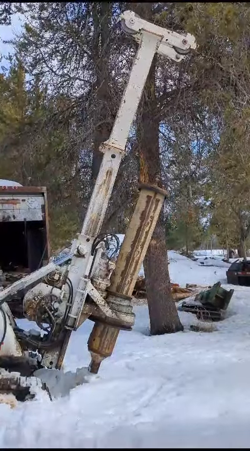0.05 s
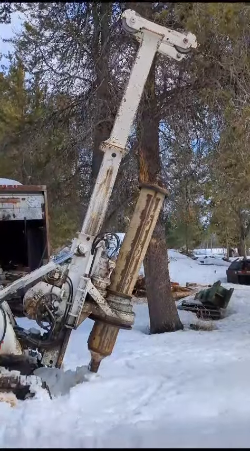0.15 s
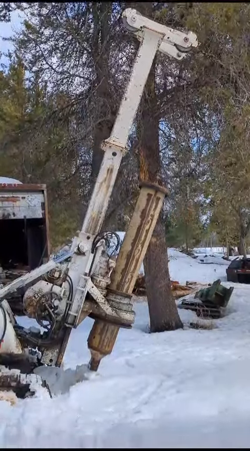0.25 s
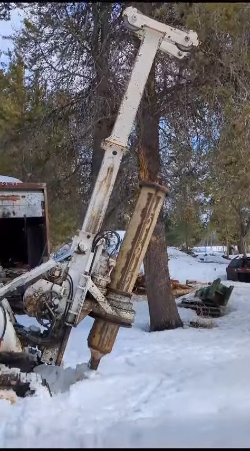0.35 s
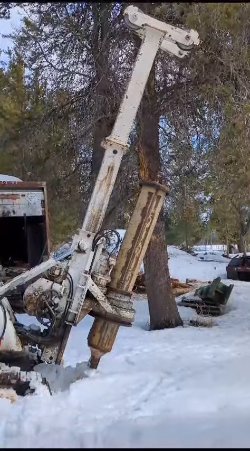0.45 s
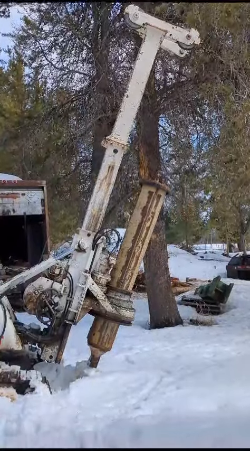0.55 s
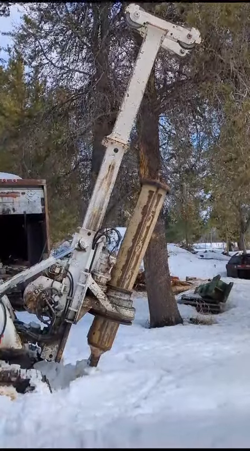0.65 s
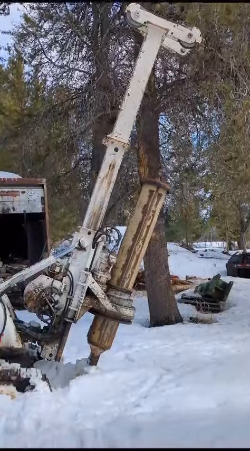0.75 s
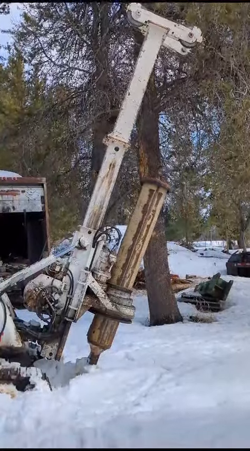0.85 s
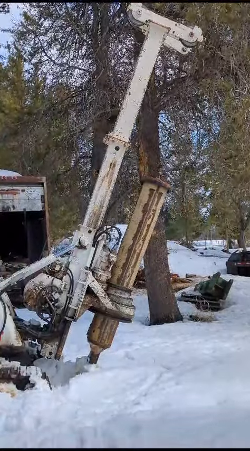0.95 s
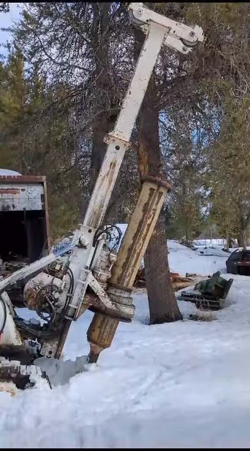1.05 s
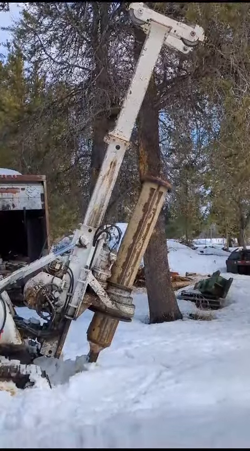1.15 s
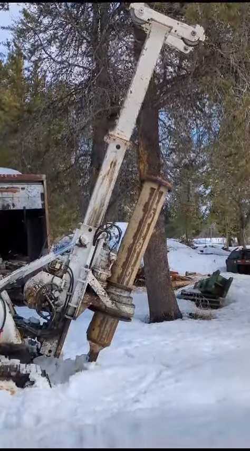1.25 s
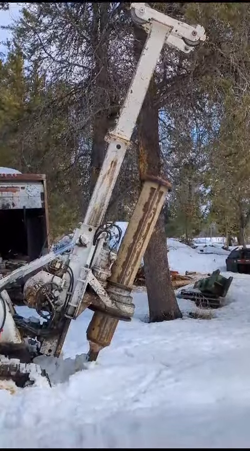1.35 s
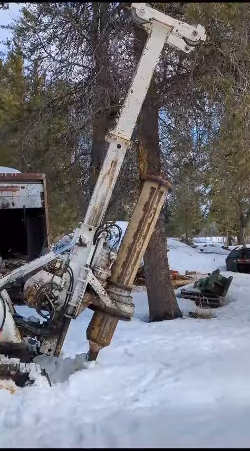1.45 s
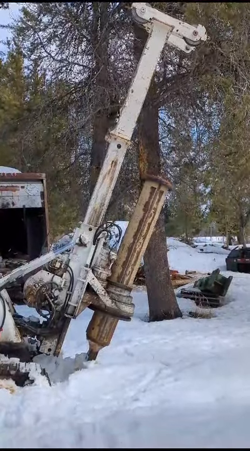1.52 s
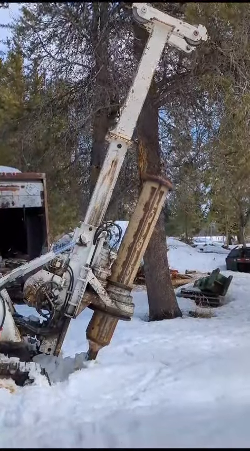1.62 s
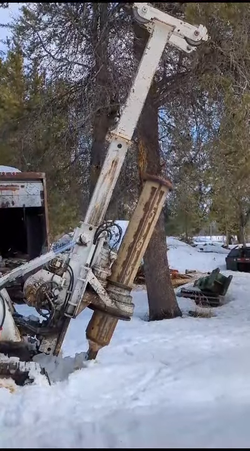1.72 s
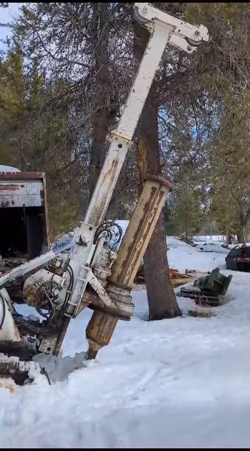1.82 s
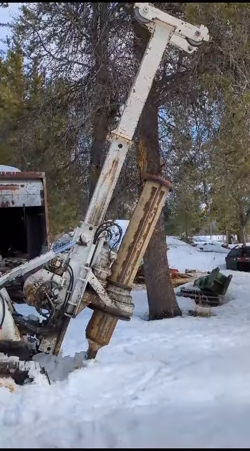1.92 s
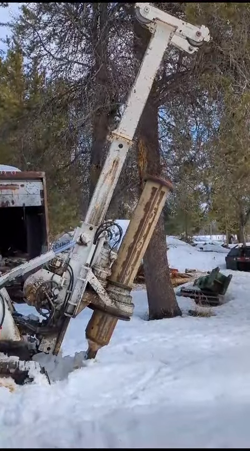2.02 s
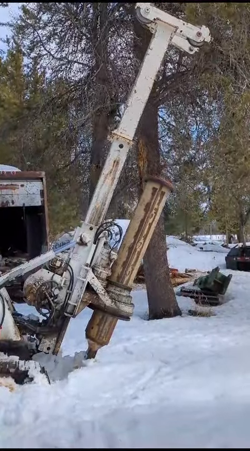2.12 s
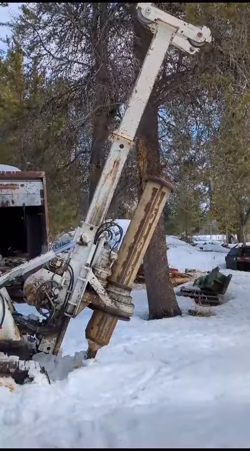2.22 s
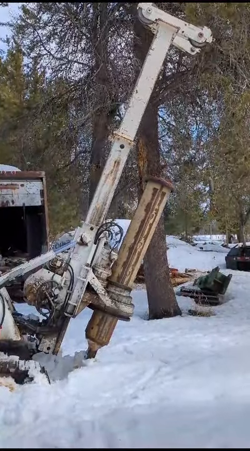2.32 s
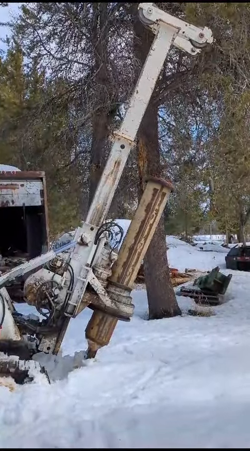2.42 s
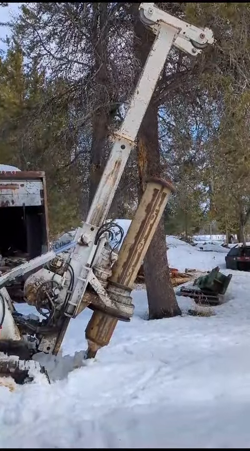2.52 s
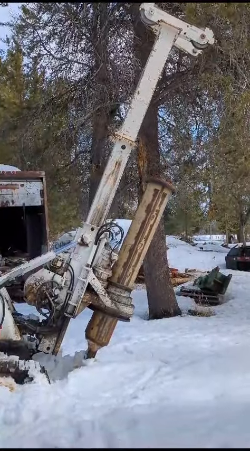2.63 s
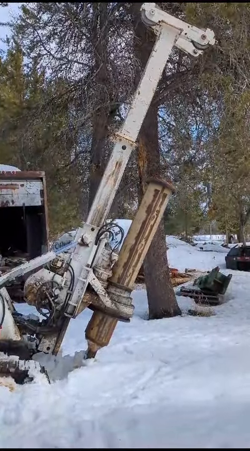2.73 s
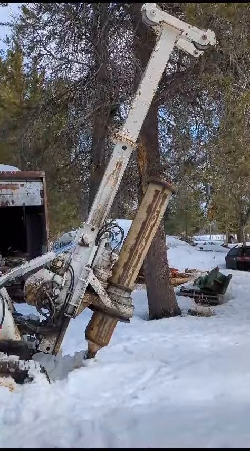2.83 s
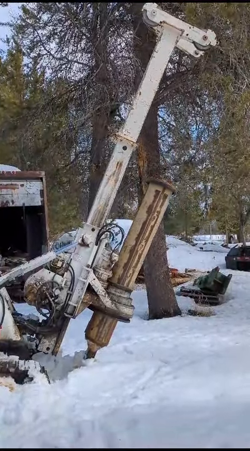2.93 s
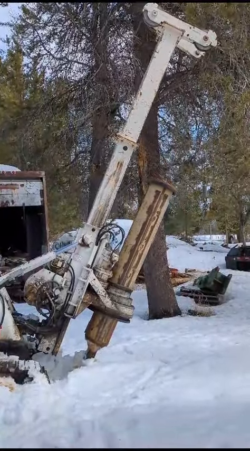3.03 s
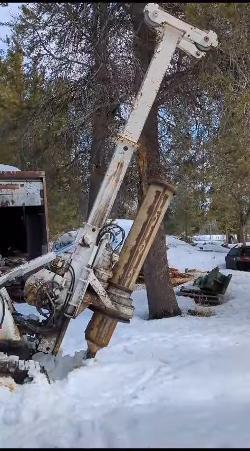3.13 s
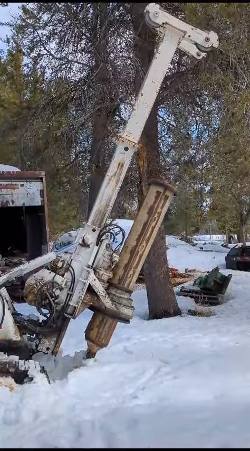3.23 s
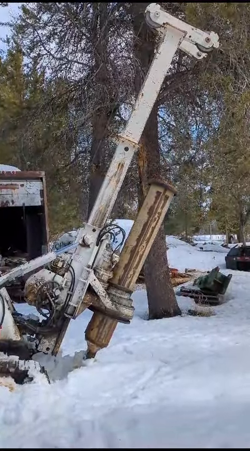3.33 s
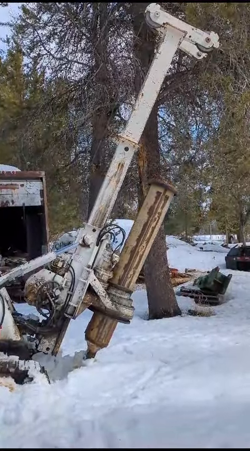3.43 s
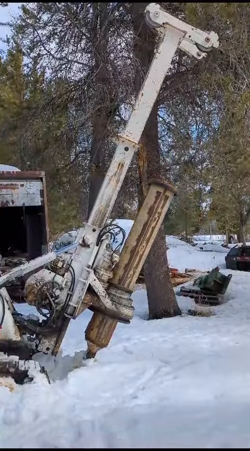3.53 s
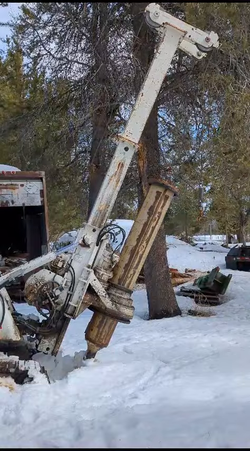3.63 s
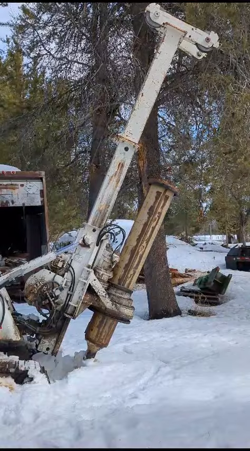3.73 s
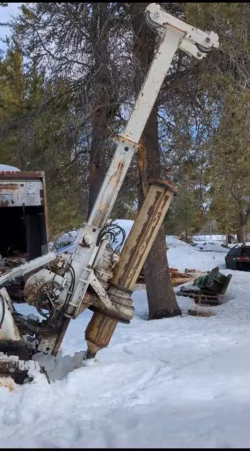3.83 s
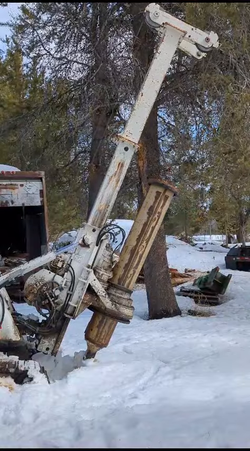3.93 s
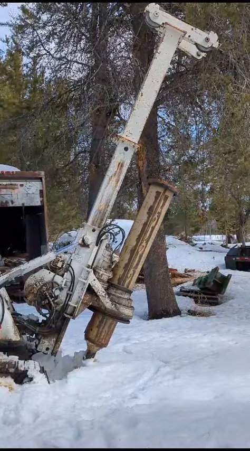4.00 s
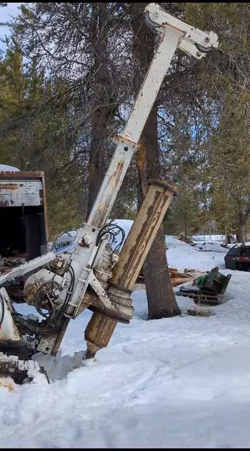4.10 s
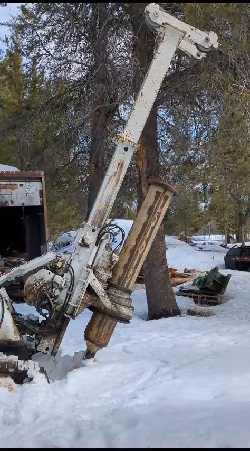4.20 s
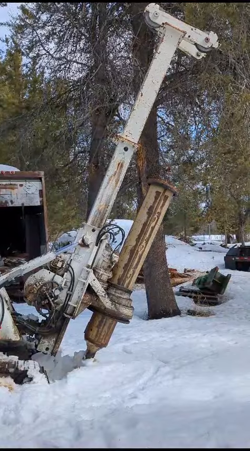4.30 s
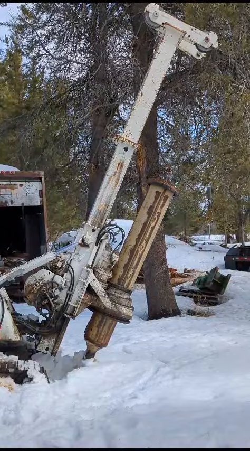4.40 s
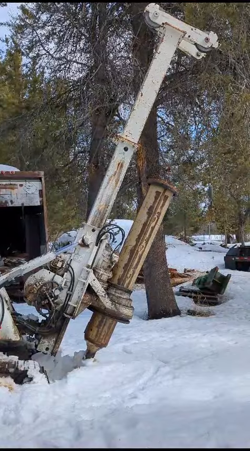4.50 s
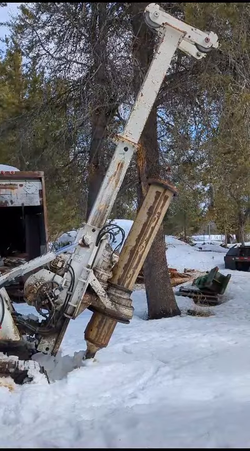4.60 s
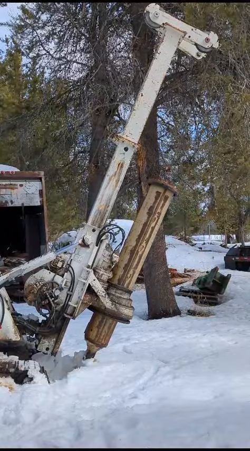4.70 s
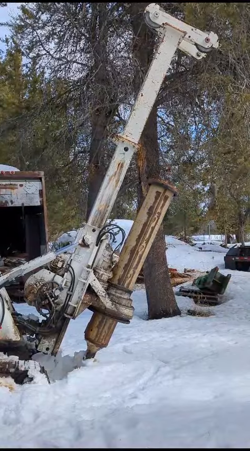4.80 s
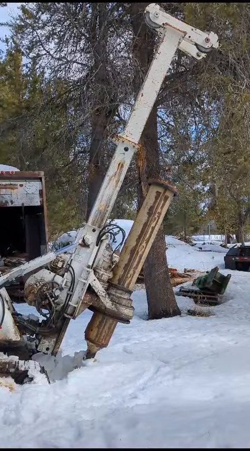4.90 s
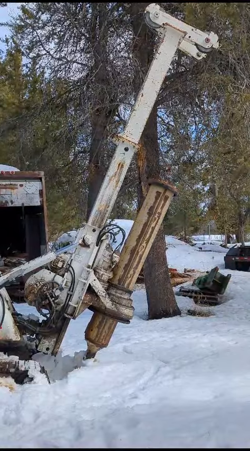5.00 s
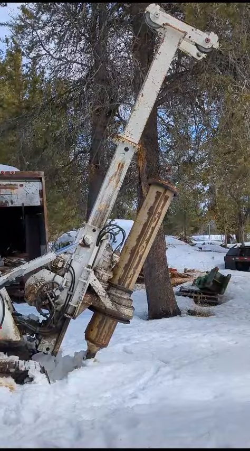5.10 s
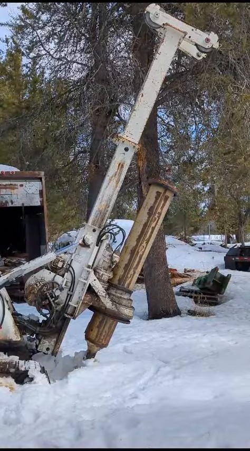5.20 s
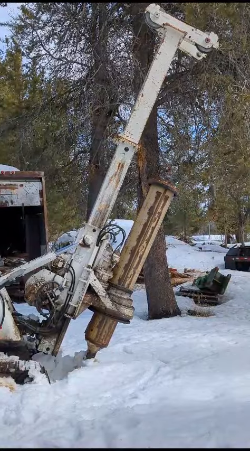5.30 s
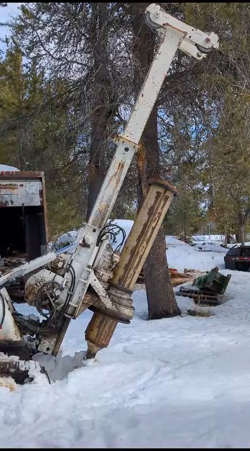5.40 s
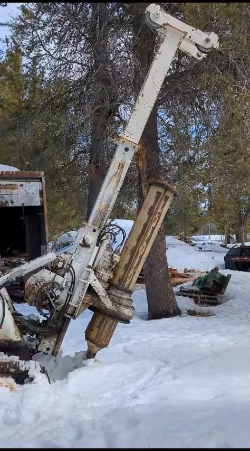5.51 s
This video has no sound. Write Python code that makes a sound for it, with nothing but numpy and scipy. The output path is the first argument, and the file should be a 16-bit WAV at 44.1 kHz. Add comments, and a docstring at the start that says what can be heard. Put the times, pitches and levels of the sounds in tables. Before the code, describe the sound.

Heavy diesel drone with dense buzzing exhaust for over three seconds, few changes beyond tiny louder spits. Short bursts of oil hiss lead into a quick rise in pitch and a clear drop in loudness; mechanical ticking and thin gear whine then show through. Finally the fuel is cut and the engine begins slowing and fading without fully stopping. Open snowy yard, phone nearby, the right side duller.

```python
"""The four-cylinder diesel of a small drill rig runs in the open on snow, off to the left of a phone.
At first it pulls a load: tones tied to the firings make the exhaust boom, and bursts of noise make its rasp.
Then the speed jumps up and the load comes off, leaving a lighter exhaust note, the clatter of the block
(a crowd of short rings), whining tones and a noisy hydraulic hiss, which already swells before the jump.
At last the fuel is cut back and the engine starts to run down: it slows, and each part fades in its own way."""
import sys
import numpy as np
from scipy import signal
from scipy.fft import rfft, irfft
from scipy.io import wavfile
from scipy.ndimage import uniform_filter1d

SR = 44100
rng = np.random.default_rng(int(sys.argv[2]) if len(sys.argv) > 2 else 0)


def wav_out(sig):
    """Save sig, one row per channel (or a flat mono array), as 16-bit PCM at SR to the path in sys.argv[1]."""
    wavfile.write(sys.argv[1], SR, np.round(np.clip(np.atleast_2d(sig).T, -1, 1) * 32767).astype(np.int16))


N = 244755
TIME = np.arange(N) / SR  # s
FREQS = np.arange(N // 2 + 1) * SR / N + 1e-3  # Hz, kept just above 0 for the logarithm

# exhaust tones under load, running free and with the fuel cut back:
# (multiple of the firing rate [1], level [dB])
LOADED_TONES = [(.5, -23), (1, 0.5), (2, -14.5), (3, -22), (3.5, -26), (4, -21.5), (5, -19.5), (5.5, -31),
                (6, -38), (6.5, -40), (7, -21.5)]
FREE_TONES = [(.5, -45), (1, 1.5), (1.5, -18.5), (2, -3), (2.5, -18), (3, -13), (3.5, -20), (4, -24.5),
              (4.5, -38), (6, -15), (6.25, -20.5), (6.75, -23)]
COAST_TONES = [(1, 0), (1.5, -21), (2, -21), (3, -12), (3.5, -20), (4.5, -21), (5, -21)]
# moments when the rasp happens to be louder, leaving out the first row: (time [s], lift [dB])
LOUDER_MOMENTS = [(.124, 0), (.945, 2.5), (2.314, 1), (2.757, 4), (2.863, 4), (3.335, 5)][1:]
# tone colour of exhaust rasp, silencer rumble, engine block, knock and oil: (frequency [Hz], level [dB])
RASP_COLOUR = [(200, -17.5), (450, 7), (560, -8), (750, 6), (1000, -7), (1350, -0.5), (1650, -1),
               (2300, -6.5), (3200, -9), (4200, -9), (5600, -20.5), (8000, -19.5), (10500, -18.5),
               (13500, -36.5)]
RUMBLE_COLOUR = [(20, 4.5), (40, -4.5), (80, 8), (120, 0.5), (190, 6), (300, 3.5), (460, 4), (540, -11.5),
                 (900, -5.5), (3000, -66)]
BLOCK_COLOUR = [(100, -25), (250, -3.5), (450, 6), (540, -2.5), (650, 4.5), (850, 3), (1150, 0), (1350, 1),
                (1600, -2), (2000, -2), (3300, -7), (5400, -18), (7200, -18), (13000, -54)]
KNOCK_COLOUR = [(400, -17), (850, -1), (1500, -0.5), (2600, -3), (4500, -22), (9000, -32), (14000, -55)]
OIL_COLOUR = [(2000, -19), (5000, 4), (8000, -2), (11000, -1.5), (13000, -10), (15500, -10)]
# resonances of pipe, block and oil valves: (frequency [Hz], width [Hz], lift [dB])
PIPE_MODES = [(770, 120, 2.5), (2210, 560, 3), (4550, 140, 10), (5095, 470, 9.5), (6580, 370, 6.5),
              (9540, 500, 4.5), (11900, 540, 5.5)]
BLOCK_MODES = [(611, 22, 9.8), (2530, 220, 1.9), (2880, 110, 1), (3536, 140, 6), (4400, 120, 6)]
VALVE_MODES = [(9300, 950, 10.5)]
# pump and gear whine: (multiple of the firing rate [1], level under load [dB], level running free [dB])
WHINE_TONES = [(8.5, -54, -45), (9.5, -47, -56), (12, -62, -45), (15, -62, -54), (22, -54, -64),
               (27, -53, -64), (28, -53, -58), (32, -55, -64)]
# openings of the oil valves: (start [s], hold [s], hiss level [dB])
VALVE_OPENINGS = [(2.66, .02, -41.5), (3.2, .06, -45), (3.46, 0.033, -50), (3.798, 0.44, -52)]
# sound scattered by trees and rig, unlike left and right: (frequency [Hz], level over the direct sound [dB])
SCATTER = [(100, -32), (350, -16), (900, -14.5), (3000, -4), (12000, 4)]
# the right side lies in the shadow of phone and hand: (frequency [Hz], right minus left [dB])
SHADOW = [(100, .3), (400, 2), (530, 3), (650, -13), (820, -2), (960, -1), (1170, -7), (1480, -3),
          (1850, -15), (2150, -9), (3700, -13), (4500, -10), (9500, -14), (12000, -8)]
# the sound reaches the right side later: (frequency [Hz], phase lag [rad])
RIGHT_LAG = [(0, 0), (65, .1), (130, .24), (480, 1.05), (860, 1.2), (1400, 1.6), (2150, 7), (3300, 8.5),
             (4200, 9), (5000, 15), (16000, 58)]

# the firing rate is steady under load, higher when free, and drops evenly with the fuel cut back
LOADED_HZ, FREE_HZ, SLOWING_HZ_PER_S = 65.73, 71.53, 24.3
SPEED_UP_AT_S, SPEED_UP_S, FUEL_CUT_AT_S = 3.325, .165, 4.965
UNLOAD_AT_S, UNLOAD_S = 3.39, 0.074  # the load drops away quickly
FUEL_FADE_S = 0.19  # time for the firings to weaken after the fuel is cut back
# average levels (dB); the rasp sounds under load only
BOOM_LOADED_DB, BOOM_FREE_DB, BOOM_COAST_DB = -15, -25, -24
RASP_DB = -26.5
RUMBLE_LOADED_DB, RUMBLE_FREE_DB = -30, -34
CLATTER_LOADED_DB, CLATTER_FREE_DB = -32, -34.5
KNOCK_LOADED_DB, KNOCK_FREE_DB = -47, -44.5
LIFT_S = 0.0067  # how far to each side of its peak a louder moment reaches
# how fast each part fades as the engine runs down (dB per s); the hiss figure is for the seeping oil
BOOM_FADE_DB_PER_S, RUMBLE_FADE_DB_PER_S, CLATTER_FADE_DB_PER_S = 5.5, 2, 6
WHINE_FADE_DB_PER_S, HISS_FADE_DB_PER_S = 45, 11
# oil always seeps through the valves; an opened valve swells, holds and shuts
SEEP_DB, VALVE_OPEN_S, VALVE_SHUT_S = -56.5, 0.087, 0.15
TOP_HZ = 15750  # the phone cuts what lies above


def exhaust_boom(firing, load, slowing_s):
    """The low note of the pipe: heavy under load, hollow when free, thin with the fuel cut back."""
    coast = np.clip(slowing_s / FUEL_FADE_S, 0, 1)
    loaded = tones(firing, LOADED_TONES, waver=.018, spread=.6)
    free = tones(firing, FREE_TONES, waver=.025, spread=2.45)
    coasting = tones(firing, COAST_TONES, waver=.07, spread=.8)
    loaded_gain = undb(BOOM_LOADED_DB) * load
    free_gain = undb(BOOM_FREE_DB) * (1 - load) * (1 - coast)
    coast_gain = undb(BOOM_COAST_DB - BOOM_FADE_DB_PER_S * slowing_s) * coast
    return loaded_gain * loaded + free_gain * free + coast_gain * coasting


def exhaust_rasp(firing, load):
    """As each cylinder lets out its gas, a turbulent jet tears from the pipe, with a short crack at its peak."""
    jet = noise_pair() * (0.11 + puffs(firing, at=0.74, rise=0.18, fall=0.19, scatter_db=1.0))
    crack = noise_pair() * puffs(firing, at=.72, rise=.04, fall=.11, scatter_db=2)
    crack = colour(crack, [(500, 0.5), (1800, 1.5), (4000, -4.0), (9000, -11.0)])  # (Hz, dB)
    gas = colour(unit(jet) + undb(-13.5) * unit(crack), RASP_COLOUR, PIPE_MODES)
    lift_db = sum(lift * np.exp(-((TIME - at) / LIFT_S) ** 2) for at, lift in LOUDER_MOMENTS)
    waver_db = 0.74 * walk(9.28)
    return unit(gas) * load * undb(RASP_DB + lift_db + waver_db)


def exhaust_rumble(firing):
    """Uneven gas flow in the silencer surges as one valve closes and again as the next lets out its gas."""
    closing = puffs(firing, at=0.407, rise=0.1, fall=0.1, scatter_db=1.5)
    opening = puffs(firing, at=0.81, rise=0.29, fall=0.46, scatter_db=3.5)
    flow = noise_pair() * (0.5 + closing + 0.64 * opening)
    return unit(colour(flow, RUMBLE_COLOUR))


def clatter(firing):
    """Valves and injectors tick once a cycle, pistons and gears once a turn; the block colours them all."""
    # a cycle is four firings, a turn of the crank is two
    valves = impacts(firing, every=4, count=56, ring_s=0.0095, slop_s=.00005, scatter_db=2.0, apart=0.57)
    pistons = impacts(firing, every=2, count=28, ring_s=0.016, slop_s=.00004, scatter_db=2.0, apart=1.0)
    return unit(colour(valves + undb(-4.5) * pistons, BLOCK_COLOUR, BLOCK_MODES))


def pump_whine(firing, load, slowing_s):
    """Pump and gears sing at multiples of the firing rate, throbbing once a cycle; fuel cut back, they fade fast."""
    throb = 1 + .42 * np.cos(2 * np.pi * (firing / 4 - .62))
    whine = 0
    for multiple, loaded_db, free_db in WHINE_TONES:
        gain = by_effort(load, slowing_s, loaded_db, free_db, WHINE_FADE_DB_PER_S)
        whine = whine + gain * undb(walk(11)) * np.cos(2 * np.pi * multiple * firing)
    return np.sqrt(2) * throb * whine


def knock(firing):
    """One cylinder knocks harder than the other three: an extra short thud of noise once a cycle."""
    blows = noise_pair() * puffs(firing / 4, at=.39, rise=.015, fall=.055, scatter_db=.8)
    return unit(colour(blows, KNOCK_COLOUR))


def oil_hiss(firing, slowing_s):
    """Oil hisses through the valves in pulses, one per firing, and louder while a valve is open."""
    flow = noise_pair() * (0.83 + puffs(firing, at=0.43, rise=.12, fall=0.36, scatter_db=3))
    opened = 0
    for start, hold, db in VALVE_OPENINGS:
        shut_at = start + VALVE_OPEN_S + hold
        opened = opened + undb(db) * (ramp(start, VALVE_OPEN_S) - ramp(shut_at, VALVE_SHUT_S))
    seep = undb(SEEP_DB - HISS_FADE_DB_PER_S * slowing_s)
    return unit(colour(flow, OIL_COLOUR, VALVE_MODES)) * np.hypot(opened, seep)


def tones(firing, table, waver, spread):
    """Exhaust tones at multiples of the firing rate; high ones waver more, and `spread` (rad) shifts their phase."""
    out = 0
    for k, db in table:
        phase = 2 * np.pi * k * firing + spread * (k - 1) ** 2 + waver * k * walk(30)
        strength = undb(db) * (1 + waver * k * walk(30))
        out = out + strength * np.cos(phase)
    return np.sqrt(2) * out


def puffs(count_up, at, rise, fall, scatter_db):
    """An envelope swells fast and dies away each time `count_up` gains 1 (the unit of at, rise and fall)."""
    number = np.floor(count_up - at + .3).astype(int)  # each puff starts .3 ahead of its peak
    offset = count_up - at - number
    strength = undb(scatter_db * rng.standard_normal(number.max() + 3))[number + 1]
    return strength * np.exp(-np.where(offset < 0, (offset / rise) ** 2, offset / fall))


def impacts(firing, every, count, ring_s, slop_s, scatter_db, apart):
    """Parts knock at fixed crank angles once in `every` firings; each part has a short ring of its own."""
    angle = (np.arange(count) + rng.random(count)) * every / count  # in firings
    near_combustion = np.cos(2 * np.pi * (angle - .45))  # the hardest knocks
    part_size = undb(1.16 * rng.standard_normal(count) + 0.95 * near_combustion)
    knocks_at = np.arange(0, firing[-1], every)[:, None] + angle
    when = np.interp(knocks_at, firing, TIME, left=-1, right=-1)  # -1 s: never heard
    when = when + slop_s * rng.standard_normal(knocks_at.shape)
    size = part_size * undb(scatter_db * rng.standard_normal(knocks_at.shape)) * (when > 0)
    t = TIME[:384]
    common = rng.standard_normal((count, len(t)))
    own = apart * rng.standard_normal((2, count, len(t)))  # unlike left and right
    rings = (common + own) * undb(-60 * t / ring_s)  # falls at the rate of 60 dB in ring_s
    places = (np.maximum(when, 0) * SR).astype(int)[..., None] + np.arange(len(t))
    sides = []
    for ring in rings:
        struck = size[..., None] * ring
        sides.append(np.bincount(places.ravel(), struck.ravel(), N)[:N])
    return unit(np.array(sides))


def noise_pair():
    """Noise left and right: a direct part they share and a scattered part of their own."""
    return rng.standard_normal(N) + colour(rng.standard_normal((2, N)), SCATTER)


def colour(x, points, modes=()):
    """Filter by a smooth spectrum with resonant peaks on it."""
    hz, db = np.transpose(points)
    db = np.interp(np.log(FREQS), np.log(hz), db)
    for centre, width, lift in modes:
        db = db + lift / (1 + (2 * (FREQS - centre) / width) ** 2)
    return irfft(rfft(x) * undb(db), N)


def walk(rate):
    """A random drift: `rate` new values a second, smoothed twice and scaled to rms 1."""
    k = int(SR / rate)
    steps = np.repeat(rng.standard_normal(N // k + 1), k)
    smooth = uniform_filter1d(uniform_filter1d(steps, k), k)
    return unit(smooth[:N])


def ramp(start, length):
    """A steady change from 0 to 1 that begins at `start` and takes `length` seconds."""
    return np.clip((TIME - start) / length, 0, 1)


def by_effort(load, slowing_s, loaded_db, free_db, fade_db_per_s):
    """Gain that follows the load between two levels and fades as the engine runs down."""
    return undb(free_db + (loaded_db - free_db) * load - fade_db_per_s * slowing_s)


def undb(db):
    """Decibels to gain."""
    return 10 ** (np.asarray(db) / 20)


def unit(x):
    """Scale to rms 1."""
    return x / np.sqrt(np.mean(x ** 2))


def scene():
    """All layers follow one crankshaft; the sound reaches the right side later and shaded."""
    load = 1 - ramp(UNLOAD_AT_S, UNLOAD_S)
    slowing_s = np.maximum(TIME - FUEL_CUT_AT_S, 0)  # time since the fuel was cut back
    speed_up = (FREE_HZ - LOADED_HZ) * ramp(SPEED_UP_AT_S, SPEED_UP_S)
    firing_hz = LOADED_HZ + speed_up - SLOWING_HZ_PER_S * slowing_s
    firing = np.cumsum(firing_hz) / SR + .71  # running count of firings
    boom = exhaust_boom(firing, load, slowing_s)
    rasp = exhaust_rasp(firing, load)
    rumble = exhaust_rumble(firing) * by_effort(
        load, slowing_s, RUMBLE_LOADED_DB, RUMBLE_FREE_DB, RUMBLE_FADE_DB_PER_S)
    ticks = clatter(firing) * by_effort(
        load, slowing_s, CLATTER_LOADED_DB, CLATTER_FREE_DB, CLATTER_FADE_DB_PER_S)
    whine = pump_whine(firing, load, slowing_s)
    knocks = knock(firing) * by_effort(
        load, slowing_s, KNOCK_LOADED_DB, KNOCK_FREE_DB, CLATTER_FADE_DB_PER_S)
    hiss = oil_hiss(firing, slowing_s)
    left, right = boom + rasp + rumble + ticks + whine + knocks + hiss
    lag = np.interp(FREQS, *np.transpose(RIGHT_LAG))
    right = irfft(rfft(colour(right, SHADOW)) * np.exp(-1j * lag), N)
    return np.array([left, right])


def record(dry):
    """The phone cuts the top with a steep low-pass filter."""
    return signal.sosfilt(signal.ellip(10, .1, 80, TOP_HZ, fs=SR, output="sos"), dry)


dry = scene()
out = record(dry)
wav_out(out)
```